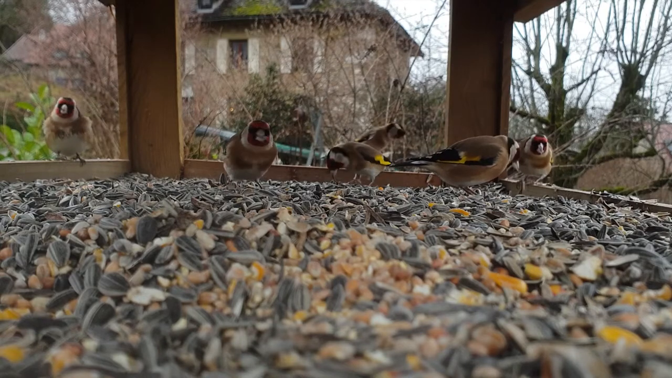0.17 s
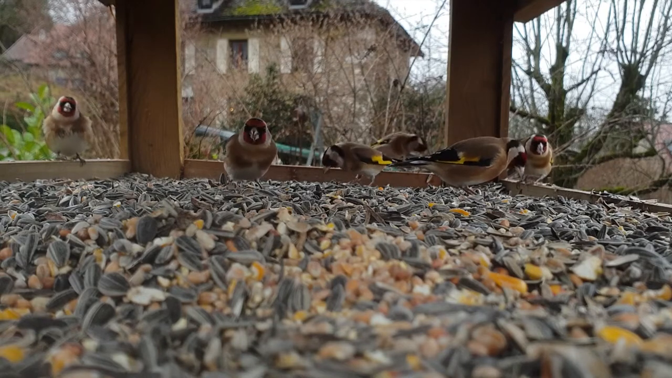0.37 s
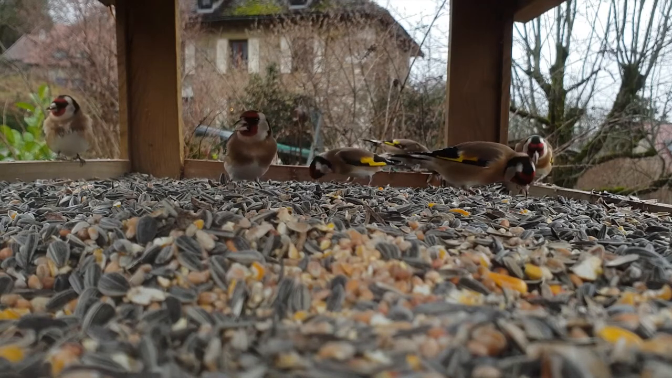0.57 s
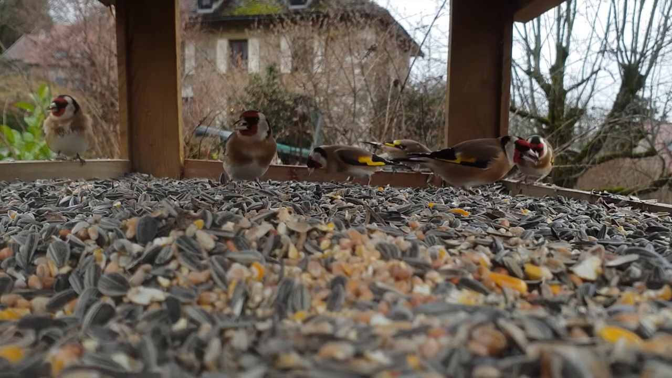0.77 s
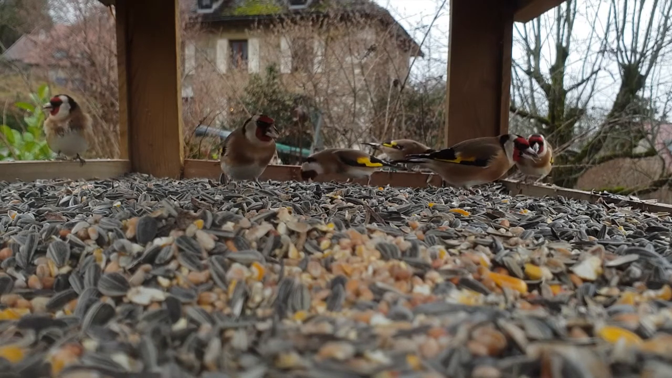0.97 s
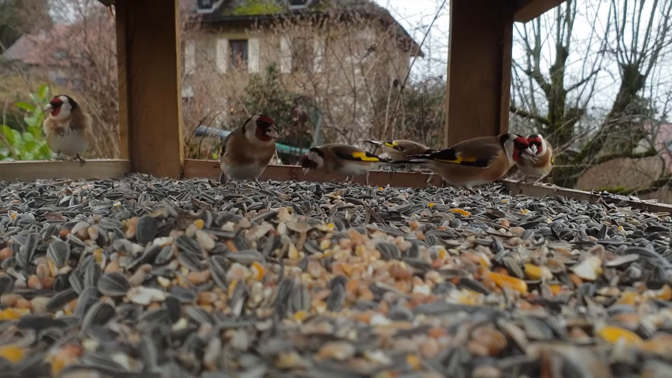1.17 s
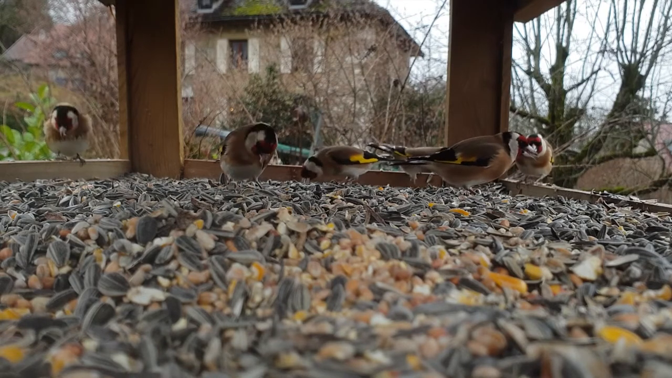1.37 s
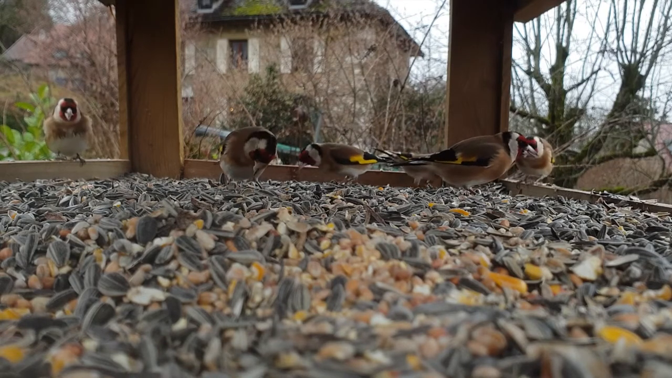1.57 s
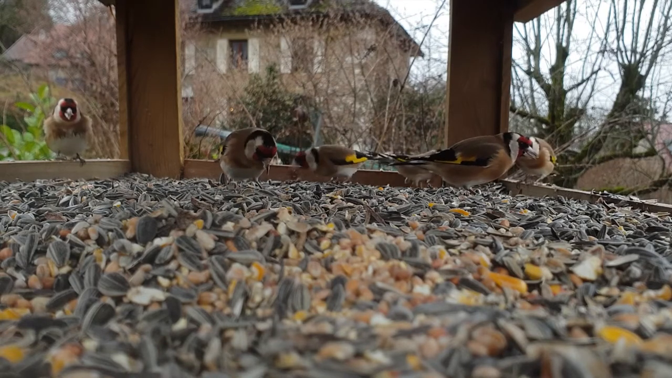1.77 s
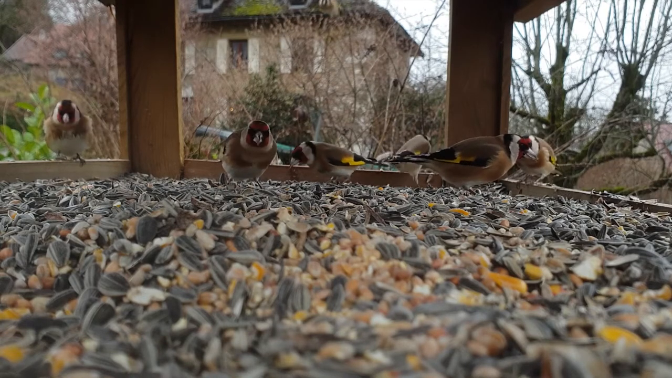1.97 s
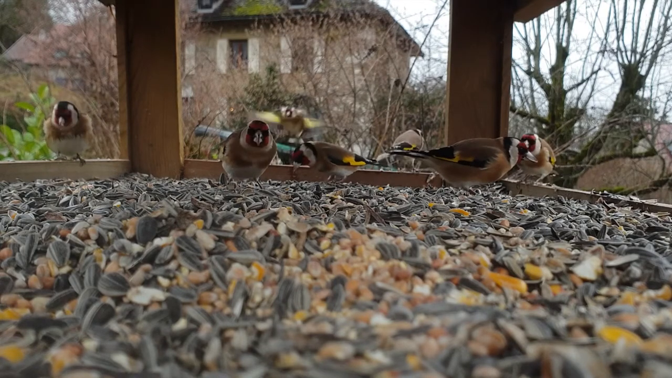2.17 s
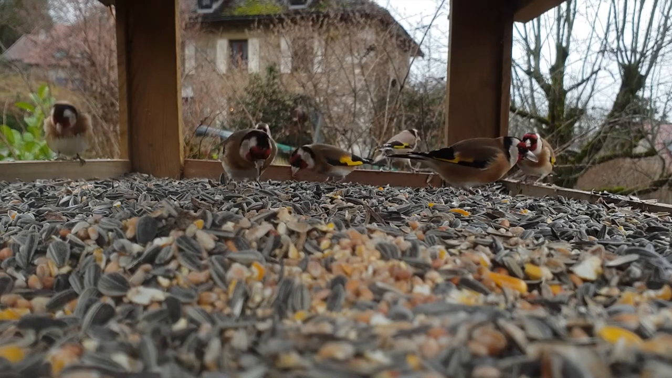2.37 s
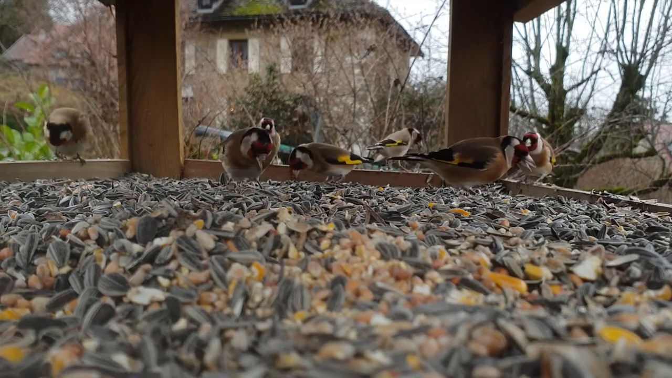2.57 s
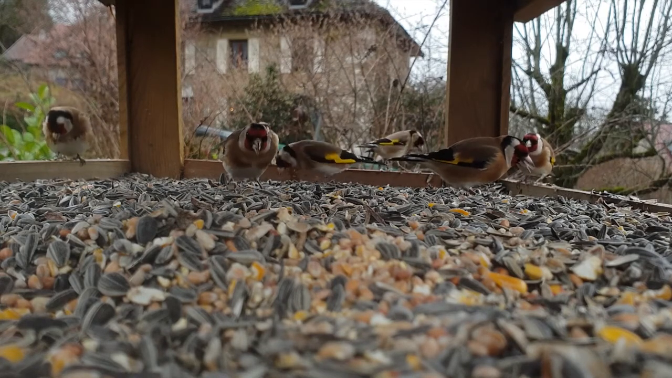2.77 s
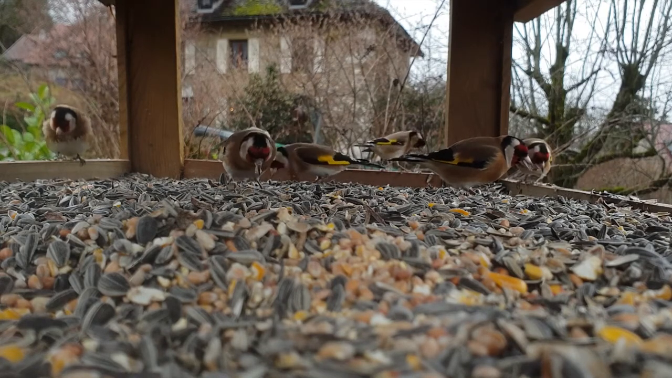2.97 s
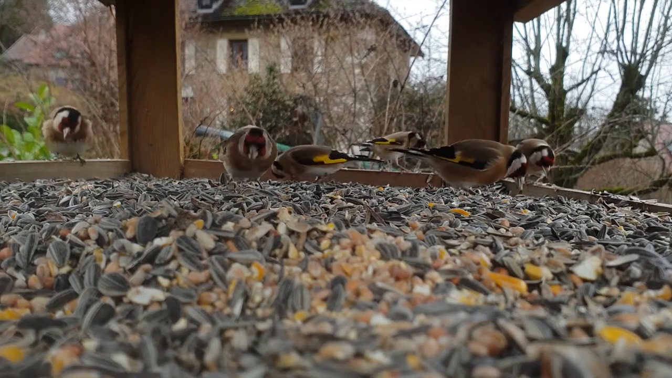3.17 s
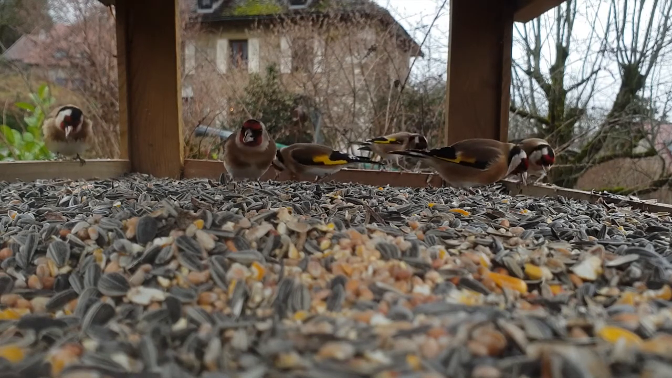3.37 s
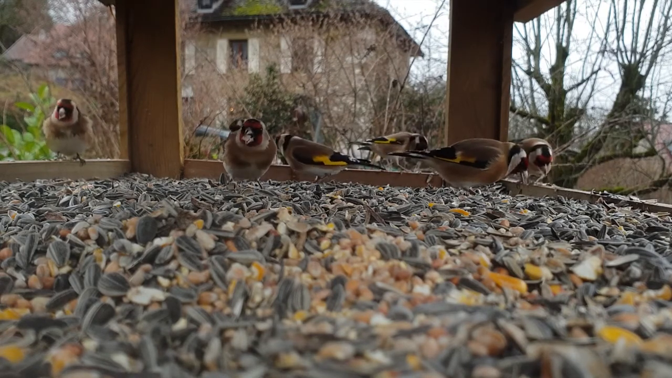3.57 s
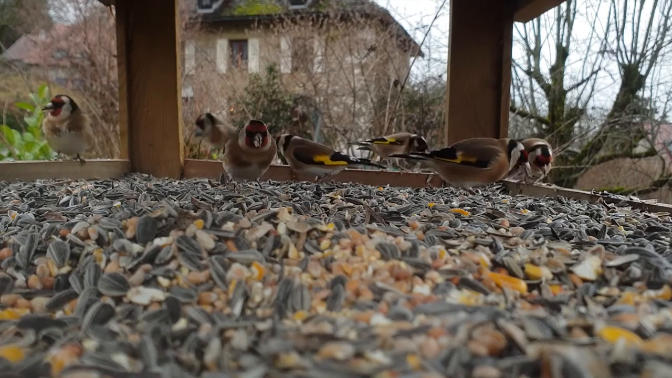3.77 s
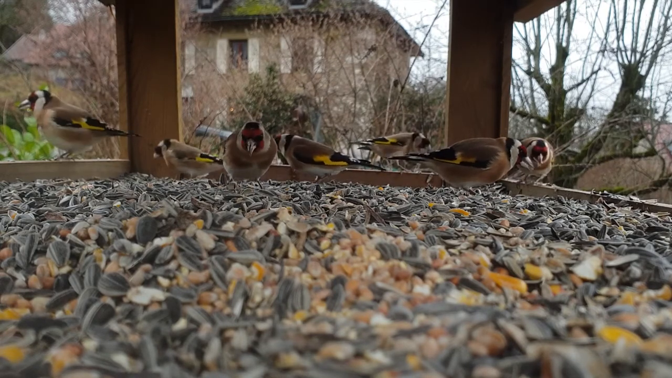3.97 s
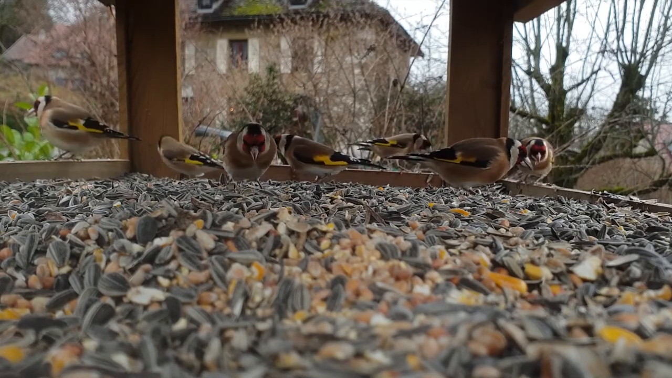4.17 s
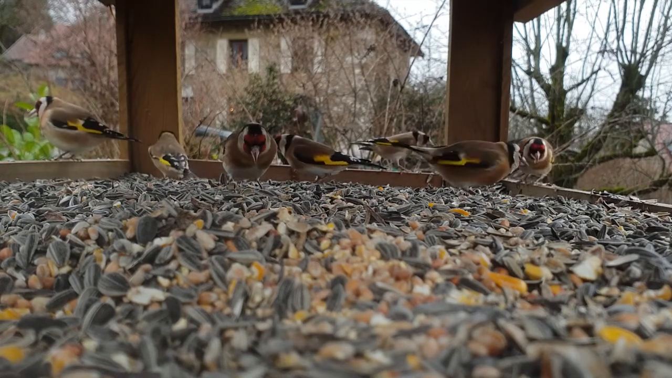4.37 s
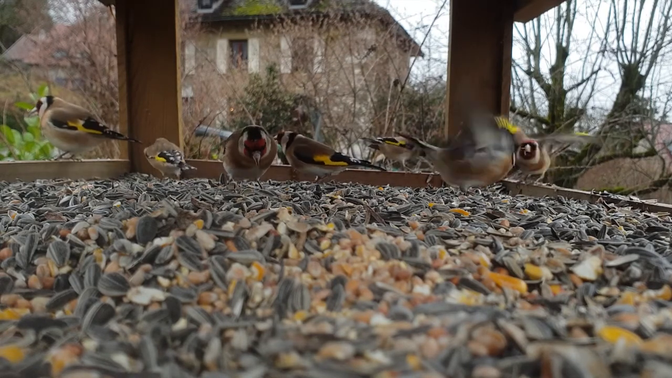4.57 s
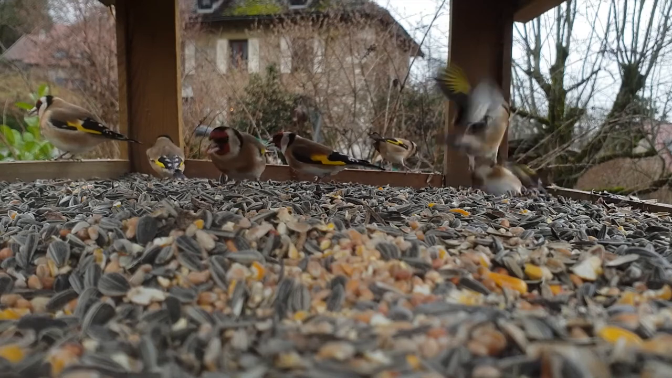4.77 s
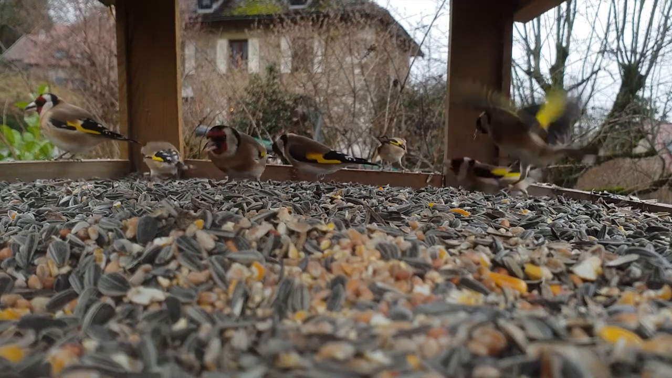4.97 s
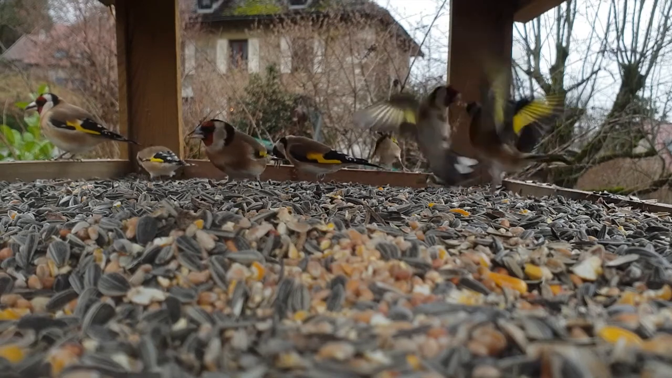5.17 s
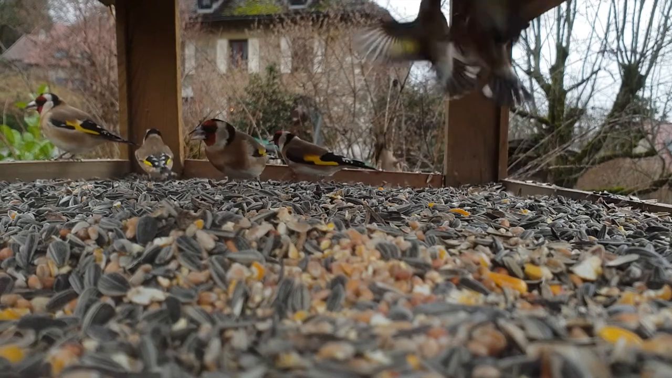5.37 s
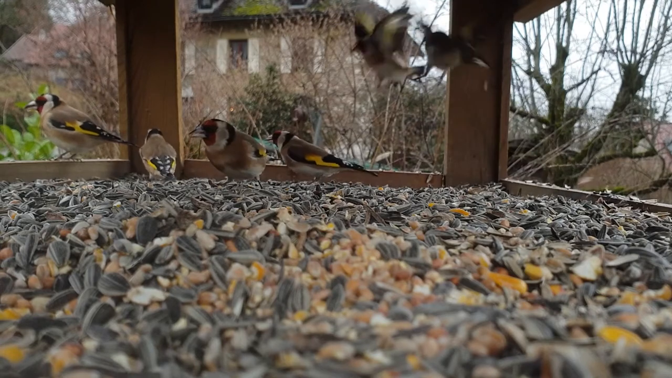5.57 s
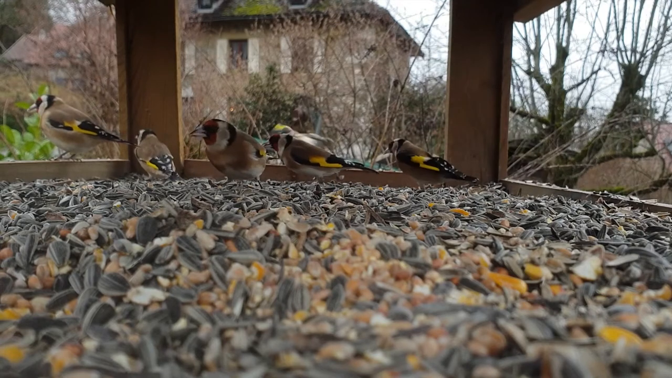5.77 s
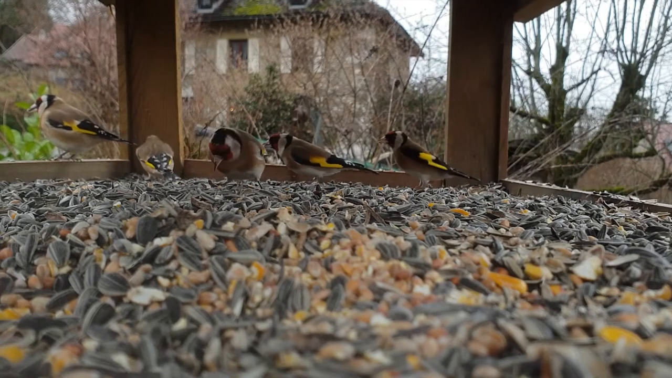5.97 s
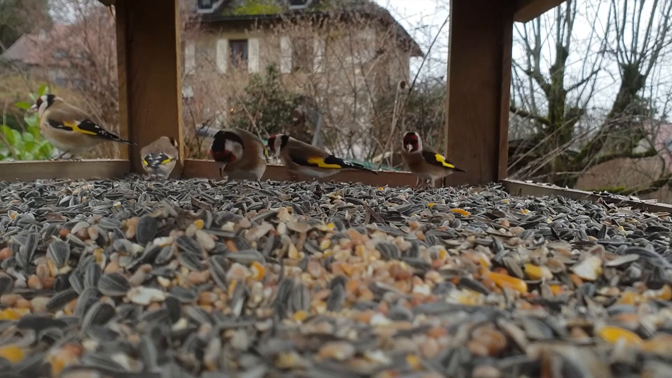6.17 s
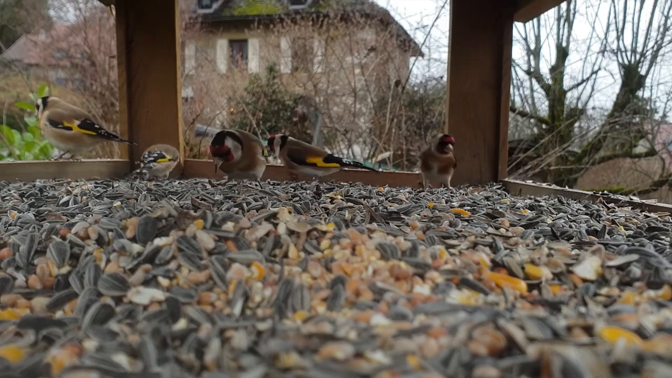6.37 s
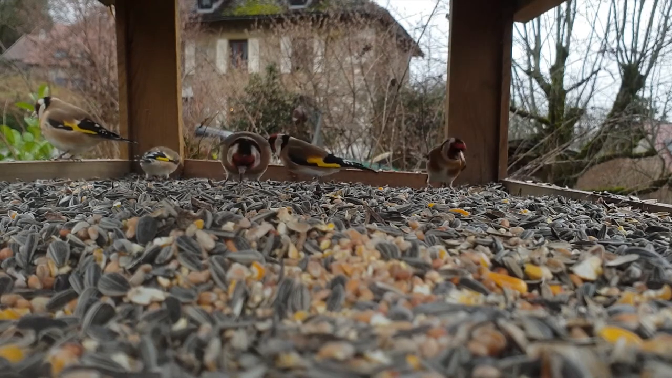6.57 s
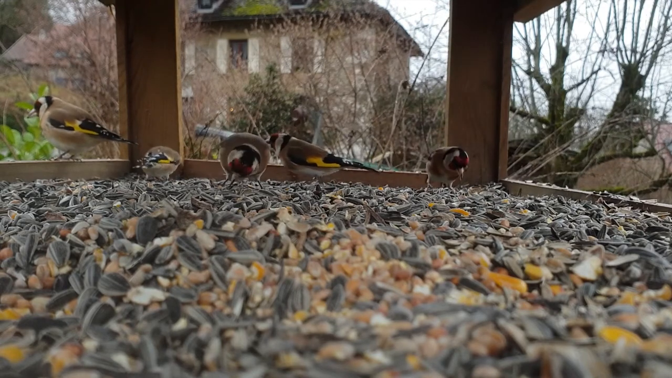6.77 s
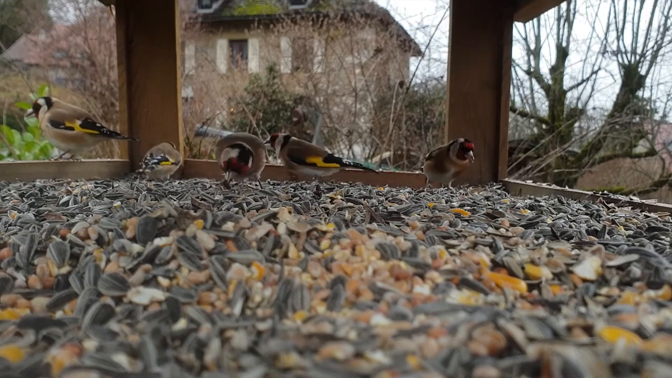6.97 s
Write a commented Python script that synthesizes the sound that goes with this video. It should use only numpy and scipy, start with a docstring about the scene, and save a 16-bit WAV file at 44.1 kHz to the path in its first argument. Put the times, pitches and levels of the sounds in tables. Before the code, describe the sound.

A seven-second close stereo scene at a wooden bird feeder in a garden, with faint low traffic haze throughout. Feet tap softly on the board and seeds tick. Short, quiet, buzzy finch rasps, each a string of very fast high whistled sweeps, open the scene, with a dull wooden knock near 0.25 s. After a sparse gap, scolding swells from 1.7 to 3 s, strongest around 2 s, with small taps and slight wing flicks. A tiny rising contact note comes at 3.6 s and another at 4.05 s. Rasps gather again, then from 4.7 to 5.8 s break into a loud, harsh, nearly continuous quarrel, leaning left, with low fluttering air pushes strongest about 5.4 s and wooden bumps near 5.7-5.85 s. Wings fade by 5.95 s; scattered rasps weaken until 6.6 s. At 6.76 s a bright, very loud husk crack snaps close right, followed by a faint scrape and smaller snaps near 6.85 s.

```python
"""Scolding finch rasps over a faint far-traffic haze, on the wooden tray of a roofed garden feeder.
A two-port microphone stands close. Rasps are made of runs of very fast whistled sweeps; feet and beaks
knock the tray as ringing board modes, short contact notes glide, and wings push shaped air noise
as two birds fly up fighting. Late on, a seed husk cracks by the right port, with a faint scrape:
bursts of tiny modes, with low board knocks as the body of the cracks."""
import sys
import numpy as np
from scipy import signal
from scipy.fft import rfft, irfft, next_fast_len
from scipy.io import wavfile
from scipy.ndimage import uniform_filter1d

SR = 44100
rng = np.random.default_rng(int(sys.argv[2]) if len(sys.argv) > 2 else 0)


def persist_wave(psi):
    """Save psi, clipped to +-1, as 16-bit WAV."""
    counts = np.round(np.clip(psi, -1, 1) * 32767).astype(np.int16)
    wavfile.write(sys.argv[1], SR, np.atleast_2d(counts).T)


N = 309141

# Far haze, spectrum shape: (f/Hz, relative level/dB)
HAZE_SPECTRUM = [(12, -63.5), (20, -44.5), (59, -3), (115, -11.5), (148, -15.5), (180, -10.5), (296, -7.5),
                 (462, -4), (502, -3), (828, -16), (1850, -9.5), (3060, -35.5), (5630, -39.5), (14100, -42),
                 (15300, -81.5)]
# Likeness of diffuse noise at the two ports: (f/Hz, correlation)
PORT_LIKENESS = [(60, 1), (150, 0.77), (380, 1), (940, -0.085), (2370, 0.38), (5930, -0.36), (14900, 0.33)]
# Balance of diffuse noise between the ports: (f/Hz, left-right level/dB)
PORT_LEAN = [(60, -3), (150, -2.5), (380, -5), (940, 0), (2370, -6.5), (5930, 3.5), (14900, -3)]
# Modes of the wooden tray: (f/Hz, level/dB, t60/s)
TRAY_MODES = [(132.4, -8.5, 0.1), (200.3, 5, 0.064), (313, 4, 0.063), (470, 3, 0.062), (792, 6, 0.034),
              (1060, -14.5, 0.027), (1621, 2, 0.053)]
# Modes of a seed husk: (f/Hz, level/dB, t60/s)
HUSK_MODES = [(800, -6, .007), (1400, -2, .0045), (2100, -1, .004), (3000, 0, .004), (4200, 0, .0035),
              (5900, -2, .003), (8200, 1, .003), (11500, -6, .002)]
# One row a run of sweeps; a long rasp of the fight may take several rows:
# (first sweep t/s, last sweep t/s, level/dB, growth first to last/dB, throat f/Hz)
SWEEP_RUNS = [(0.015, 0.029, -46.5, 7, 3940), (0.072, 0.094, -42, -3, 4560),
              (0.155, 0.171, -56.5, 22, 4400), (0.299, 0.315, -50, 2, 6560), (0.379, 0.392, -60, 1, 5000),
              (0.667, 0.681, -64.5, 6, 5140), (0.784, 0.799, -62.5, 4, 5130),
              (1.683, 1.697, -57.5, 7, 5252), (1.731, 1.732, -53, 2, 4500), (1.754, 1.78, -43, -3, 5460),
              (1.833, 1.86, -39.5, 6, 5300), (1.902, 1.957, -31, 7, 6000), (2.007, 2.06, -31.5, 4, 5900),
              (2.091, 2.092, -43.5, 1, 5520), (2.146, 2.185, -38, -7, 5070), (2.218, 2.243, -39, 12, 4000),
              (2.258, 2.297, -40.5, 9, 4900), (2.319, 2.348, -43.5, 14, 4220),
              (2.397, 2.397, -59.5, 0, 4600), (2.46, 2.475, -52, -9, 4600), (2.597, 2.611, -59.5, -5, 4500),
              (2.64, 2.653, -55.5, 2, 4750), (2.718, 2.731, -55.5, 0.5, 4250),
              (2.799, 2.825, -49.5, 15, 4400), (2.881, 2.92, -47.5, 2, 4700), (2.998, 3.041, -44, 4, 4900),
              (3.408, 3.422, -60.5, 11, 4700), (3.781, 3.796, -56.5, 1, 4600),
              (3.842, 3.854, -53.5, 24.5, 5170), (3.907, 3.933, -39.5, -4, 6100),
              (3.975, 3.992, -45.5, 12, 5600), (4.125, 4.14, -57.5, 2.5, 5160),
              (4.191, 4.223, -42, 6, 5130), (4.259, 4.316, -46, 23, 4950), (4.338, 4.338, -47.5, -1, 5050),
              (4.379, 4.421, -40.5, 13, 5300), (4.449, 4.463, -42, 8, 5000), (4.491, 4.547, -36.5, 0, 5030),
              (4.588, 4.689, -37.5, 21.5, 5080), (4.707, 4.721, -41, -3, 4600),
              (4.747, 4.792, -23.5, 15, 5950), (4.801, 4.83, -20.5, -5, 5410),
              (4.848, 4.877, -28, -6, 5280), (4.895, 4.94, -22.5, 9, 5480), (4.964, 5.065, -29, -5, 4900),
              (5.096, 5.109, -37, 13, 4860), (5.131, 5.204, -26.5, 4.5, 4700),
              (5.219, 5.233, -26, 1.5, 5180), (5.246, 5.277, -24, -10.5, 5080),
              (5.312, 5.369, -27, 13.5, 5060), (5.39, 5.431, -24.5, 7.5, 5300),
              (5.449, 5.518, -23, -17, 4860), (5.568, 5.658, -23.5, -1.5, 5010),
              (5.686, 5.716, -26, 5, 4760), (5.743, 5.796, -30.5, 15, 4750), (5.843, 5.858, -43.5, 6, 4700),
              (5.887, 5.887, -55, 0, 4640), (5.925, 5.926, -46.5, 0, 4500),
              (5.989, 6.004, -44.5, 12.5, 5070), (6.042, 6.081, -35.5, 8, 5000),
              (6.156, 6.173, -43.5, -9, 5160), (6.233, 6.236, -38.5, 0.5, 6570),
              (6.281, 6.311, -42, 19, 4660), (6.358, 6.373, -45.5, 6, 4530), (6.435, 6.451, -48.5, 7, 5000),
              (6.543, 6.556, -55.5, -3.5, 4830), (6.609, 6.624, -58.5, -2, 4260)]
# A run of three or more sweeps begins and ends weaker, a hard one less so: (level/dB, ends level/dB)
SOFT_ENDS = [(-35, -8), (-28, -3.5)]
# A wide-open beak deepens those weak ends: (throat f/Hz, factor)
WIDE_ENDS = [(5600, 0.97), (6000, 2.34)]
# An open beak lifts the sweep: (throat f/Hz, top of sweep f/Hz)
SWEEP_TOP = [(4200, 6800), (5300, 7050), (5500, 7950)]
# Place of the quarrel: (t/s, delay of left after right/s, left-right level/dB)
QUARREL_PLACE = [(0, -0.00017, 8), (4.999, 0.0015, 7), (5.2, .0006, 7.5), (7.0, .0007, 10)]
# Uneven shading of close calls by the ports: (f/Hz, left-right level/dB)
PORT_SHADING = [(2000, -4.5), (4500, -2), (6500, -7.5), (8500, -31), (12000, -14)]
# Band of the calls at the capsule: (f/Hz, level/dB)
CALL_BAND = [(2000, 2), (2700, 9.5), (9000, -6), (12000, -1), (13500, -17), (15000, -23)]
# Feet and beaks on the tray; the knocks at 6.758 and 6.851 s are the low body of the husk snaps:
# (t/s, level/dB, hardness 0-1)
KNOCKS = [(0.229, -34, 0), (0.247, -27, 0), (0.471, -40, 0), (1.727, -34, 1), (1.874, -41, 0.11),
          (2.148, -39, 0.4), (2.469, -36, 0.1), (2.549, -38.5, 0.55), (2.702, -36, 0), (3.1, -40, 0),
          (3.998, -40, 0.4), (4.356, -37.5, 0.36), (4.415, -42, 0.1), (4.833, -29.5, 0), (5.124, -35, 0),
          (5.599, -42, 0.6), (5.663, -30, 0.4), (5.708, -31, 0.82), (5.845, -25, 0.0), (5.921, -40.5, 0.93),
          (6.213, -38, 0.5), (6.719, -37, 0), (6.758, -31, 0.45), (6.793, -34.5, 0.4), (6.851, -45, 0.3)]
# Contact notes: (t/s, length/s, level/dB, start f/Hz, end f/Hz, left-right level/dB,
#                 level/dB of overtones 2, 3, 4)
NOTES = [(.59, .05, -72, 4750, 4600, 0, -40, -40, -40), (3.644, .02, -47, 2280, 2680, 6, -13, -6, -8),
         (4.052, .022, -56, 2650, 3350, -8, -30, -40, -40)]
# Single wing flicks of feeding birds: (t/s, length/s, air push level/dB)
FLICKS = [(2.427, .12, -48), (2.68, 0.097, -51), (4.078, 0.1, -51), (6.497, .1, -50)]
# Flight of the fighting pair: (t/s, air push level/dB)
FIGHT_PUSH = [(4.7, -56.5), (4.9, -48), (5.34, -49.5), (5.41, -35.5), (5.52, -36), (5.6, -42), (5.8, -49),
              (5.88, -39.5), (5.94, -61)]
# Air pushed by wings, spectrum shape: (f/Hz, relative level/dB)
PUSH_SPECTRUM = [(12, -71.5), (20, -20), (81, -3), (183, -3.5), (218, -1.5), (440, -10.5), (515, -2.5),
                 (900, -22), (1170, -73), (1980, -120)]
# Husk snaps by the right port, with a faint scrape at 6.837-6.843 s as weak snaps:
# (t/s, level/dB, tilt/dB per octave, fall of splinters/dB per ms)
SNAPS = [(6.7561, -8, 0, -8), (6.7596, -.4, 0, -9), (6.8372, -38, -6, -4), (6.8425, -40, -6, -.2),
         (6.8503, -17, -6, -3), (6.8577, -22, -8, -1)]

HAZE_DB = -49.5
SWEEPS_PER_S = 69.5  # nominal; each run fits a whole number of sweeps
SHIFT_DB = 2.5  # typical left-right shift of the caller from run to run
SWISH_DB = -9  # feather swish relative to the air push
SPLINTERS, SPLINTER_GAP_MS = 3, 1.4  # after each snap; the gap is nominal
SPLINTER_TILT_DB = -1.2  # dB per octave, each splinter duller than the last
EDGE_HZ = 14800


def amp(db):
    """Decibels to gain."""
    return 10 ** (np.asarray(db) / 20)


def evened(x):
    """Scales to rms 1."""
    return x / np.sqrt(np.mean(x ** 2) + 1e-20)


def read(points, hz):
    """Reads a spectrum table on a log-frequency axis."""
    f, value = np.transpose(points)
    return np.interp(np.log(hz + 1), np.log(f + 1), value)


def add(mix, s, sound):
    """Mixes a two-channel sound in at time s."""
    part = mix[:, max(round(s * SR), 0):][:, :sound.shape[1]]
    part += sound[:, :part.shape[1]]


def air(spectrum, patchy_db):
    """Two-port noise with drifting patches in time and frequency; the ports agree best in the bass."""
    frames = N // 256 + 5
    hz = np.fft.rfftfreq(1024, 1 / SR)
    a, b, c, d, patches = rng.standard_normal((frames, 513, 5)).T
    patches = uniform_filter1d(patches, size=8, axis=0)
    patches = evened(uniform_filter1d(patches, size=10, axis=1))
    same = np.clip(read(PORT_LIKENESS, hz), -1, 1)[:, None]
    left = a + 1j * b
    right = same * left + np.sqrt(1 - same ** 2) * (c + 1j * d)
    lean = read(PORT_LEAN, hz)[:, None] / 2
    level_db = read(spectrum, hz)[:, None] + patchy_db * patches
    bins = np.array([left, right]) * amp(level_db + np.array([lean, -lean]))
    return evened(signal.istft(bins, nperseg=1024, noverlap=768)[1][:, :N])


def feeder(x, pan_db, echo_db, t60, tail_db, lag=0.):
    """Direct sound, sparse echoes off seeds, roof and posts, other ones at each port, faint garden tail."""
    size = 4000
    t = np.arange(size) / SR
    echoes = amp(echo_db - 60 * t / t60) + amp(tail_db - 60 * t / 0.21)
    sparse = rng.random((2, size)) < .1
    taps = rng.standard_normal((2, size)) * sparse * echoes
    taps[:, 0] += 1  # direct sound
    taps /= np.linalg.norm(taps, axis=1, keepdims=True)
    late = int(lag < 0)  # a positive lag delays the left port, a negative one the right
    taps[late] = np.roll(taps[late], round(abs(lag) * SR))
    return signal.fftconvolve(x[None], taps, axes=1) * amp([[pan_db / 2], [-pan_db / 2]])


def ring(modes, tilt_db, luck_db, size):
    """One blow on a set of modes, each caught by a different amount; tilt is dB per octave."""
    t, out = np.arange(size) / SR, 0
    for k, (hz, db, t60) in enumerate(modes):
        luck = rng.standard_normal(2)
        level_db = db + tilt_db * np.log2(hz / modes[1][0]) + luck_db * luck[0] - 60 * t / t60
        rise = 1 - np.exp(-t * hz / 0.25)  # a mode builds up over part of a cycle
        rise *= (-1) ** k  # neighbours swing against each other, filling the gaps between them
        out = out + rise * amp(level_db) * np.sin(2 * np.pi * hz * (1 + .03 * luck[1]) * t)
    return out / abs(out).max()


def haze():
    """Far traffic haze filling the garden: diffuse noise with slight patches."""
    return amp(HAZE_DB) * air(HAZE_SPECTRUM, patchy_db=1.0)


def shuffle():
    """Faint random taps of feet on the board and ticks of rolling seeds, each a struck set of modes."""
    out = np.zeros((2, N))
    for modes, per_s, db in ((TRAY_MODES, 25, -40), (HUSK_MODES, 30, -59)):
        strength = amp(4.0 * np.minimum(rng.exponential(1, N), 4))
        blows = strength * (rng.random(N) < per_s / SR)
        kind = rng.integers(0, 4, size=N)
        for k in range(4):
            tap = ring(modes, 1.2 * k - 3, luck_db=3.0, size=3000)
            taps = signal.oaconvolve(blows * (kind == k), tap / np.linalg.norm(tap))[:N]
            # each kind leans to the right port by its own amount
            out += amp(db + np.array([[-2], [2]]) * (4.0 - k)) * taps
    return out


def sweep(db, top_hz, throat_hz):
    """One whistle shoots up to its top and sags back; the throat favours part of the sweep."""
    t = np.arange(600) / SR
    arch = np.interp(t, [0, .0048, .0066, .0084, .0136], [0.29, .88, 1, 0.79, 0.36])
    swell = np.sin(np.pi * (t / t[-1]) ** .8) ** 1.4
    luck = rng.standard_normal(4)
    # the membrane does not hold a clean pitch
    shake = evened(uniform_filter1d(rng.standard_normal(len(t)), size=11))
    hz = top_hz * (1 + .07 * luck[0]) * arch * (1 + .06 * shake)
    phase = 2 * np.pi * np.cumsum(hz) / SR + 7 * luck[1]
    octaves_off = np.log2(hz / throat_hz / (1 + .08 * luck[2]))
    throat = amp(-9 * (octaves_off / .43) ** 2) + amp(-14)
    # a wide-open beak raises the throat and lets the overtone out
    over_db = -16 + 22 * np.log2(throat_hz / 5000)
    tone = throat * np.sin(phase) + amp(over_db - 2 * arch ** 2) * np.sin(2 * phase)
    # only a hard call keeps the falling half loud
    sag_db = np.clip(.5 * (db + 27), -14, 0) * np.clip(t / .002 - 3.2, 0, 1)
    tone = tone * swell * amp(sag_db + 2.0 * shake[::-1])
    return amp(db + 1.5 * luck[3]) * tone / np.sqrt(np.sum(tone ** 2) / 260)


def sweep_run(first, last, level_db, growth_db, throat_hz):
    """A rasp or a piece of one: evenly spaced sweeps, placed where the quarrel is at that time."""
    count = round((last - first) * SWEEPS_PER_S) + 1
    starts = np.linspace(0, last - first, count)
    way = np.linspace(0, 1, count)
    ends_db = np.interp(level_db, *np.transpose(SOFT_ENDS)) * read(WIDE_ENDS, throat_hz) * (count > 2)
    contour_db = [ends_db - growth_db / 2, 0, 0, ends_db + growth_db / 2]
    levels = level_db + np.interp(way, [0, .35, .7, 1], contour_db)
    top_hz = read(SWEEP_TOP, throat_hz)
    out = np.zeros(round((last - first) * SR) + 700)
    for s, db in zip(starts, levels):
        k = round(s * SR)
        out[k:k + 600] += sweep(db, top_hz, throat_hz)
    at, lag, pan_db = np.transpose(QUARREL_PLACE)
    pan_db = np.interp(first, at, pan_db) + SHIFT_DB * rng.standard_normal()
    return feeder(out, pan_db, echo_db=-9.5, t60=.026, tail_db=-30, lag=np.interp(first, at, lag))


def quarrel():
    """All rasps, coloured by the capsule band and the uneven shading of close sounds at the ports."""
    voices = np.zeros((2, N))
    for s, *row in SWEEP_RUNS:
        add(voices, s - .005, sweep_run(s, *row))
    size = next_fast_len(N)
    hz = np.fft.rfftfreq(size, 1 / SR)
    shade = amp(read(CALL_BAND, hz) + np.array([[.5], [-.5]]) * read(PORT_SHADING, hz))
    return irfft(rfft(voices, size) * shade, size)[:, :N]


def knock(db, hard):
    """A soft blow moves the low modes of the board, a hard one the high ones; the loose seeds tick."""
    board = ring(TRAY_MODES, 12 * hard - 6, luck_db=3.0, size=5000)
    # a small board radiates no deep bass
    board = signal.lfilter(*signal.butter(2, 70, "high", fs=SR), board)
    seeds = ring(HUSK_MODES, 0.95, luck_db=3.0, size=500)
    tick = amp(-17) * feeder(seeds, 0, echo_db=-3, t60=0.027, tail_db=-43)
    return amp(db) * (board[:tick.shape[1]] * amp([[-2.5], [1.5]]) + tick)


def note(length, db, hz0, hz1, pan_db, *over_db):
    """A short contact note gliding evenly in pitch, its overtones growing toward the end."""
    t = np.arange(round(length * SR)) / SR
    phase = 2 * np.pi * np.cumsum(hz0 + (hz1 - hz0) * t / length) / SR
    tone = np.sin(phase)
    for k, overtone_db in enumerate(over_db):
        tone = tone + amp(overtone_db) * (t / length) * np.sin((k + 2) * phase)
    return feeder(amp(db) * tone * np.hanning(len(t)), pan_db, echo_db=-14, t60=.05, tail_db=-34)


def wings():
    """Lumpy low air pushes at the wing beat and at each single flick, with a dry feather swish on each."""
    s, push_db = np.transpose(FIGHT_PUSH)
    t = np.arange(N) / SR
    # a 21 Hz wing beat whose pace wavers
    beat = amp(1.5 * np.sin(2 * np.pi * 21 * t + 2.0 * np.sin(2 * np.pi * 2.3 * t)))
    level = amp(np.interp(t, s, push_db, -120, -120)) * evened(beat)
    for at, length, db in FLICKS:
        level = level + amp(db) * np.sin(np.pi * np.clip((t - at) / length, 0, 1)) ** 2
    swish = air([(600, -30), (1000, 0), (2300, -3), (5000, -14), (14000, -30)], patchy_db=2.5)
    return level * (air(PUSH_SPECTRUM, patchy_db=1.6) + amp(SWISH_DB) * swish)


def snap(db, tilt_db, fall_db):
    """A burst of husk modes and its splinters; the left port hears them later, weaker, by the walls."""
    crack = np.zeros(1100)
    for k in range(SPLINTERS + 1):
        ms = SPLINTER_GAP_MS * k * rng.uniform(.85, 1.15)
        at = round(ms * SR / 1000)
        burst = ring(HUSK_MODES, tilt_db + SPLINTER_TILT_DB * k, luck_db=1.0, size=700)
        crack[at:at + 700] += amp(db + fall_db * ms) * burst
    near = feeder(crack, 0, echo_db=-19, t60=.012, tail_db=-60)[1]
    far = feeder(crack, 0, echo_db=-8.5, t60=0.013, tail_db=-42, lag=0.00072)[0]
    return np.array([amp(-15.5) * far, near])


def scene():
    """Haze, shuffling and wings under the calls, knocks and snaps."""
    mix = haze() + shuffle() + quarrel() + wings()
    for table, play in ((KNOCKS, knock), (NOTES, note), (SNAPS, snap)):
        for s, *row in table:
            add(mix, s, play(*row))
    return mix


def record(dry):
    """The band limit of the recorder: a steep low-pass filter."""
    lowpass = signal.firwin(511, EDGE_HZ, window=("kaiser", 9), fs=SR)
    return signal.oaconvolve(dry, lowpass[None], "same")


dry = scene()
out = record(dry)
persist_wave(out)
```